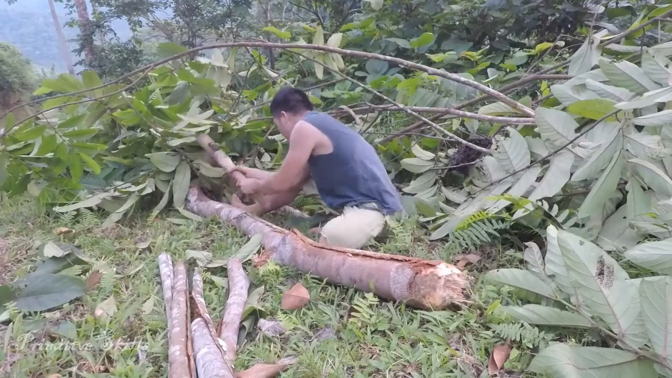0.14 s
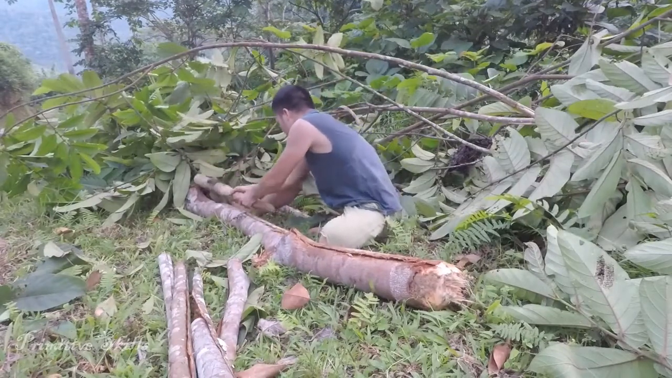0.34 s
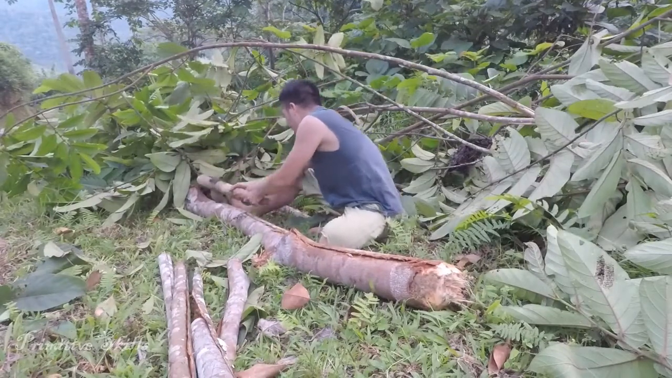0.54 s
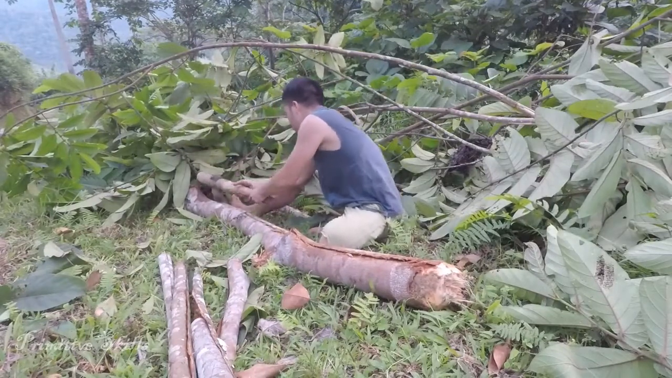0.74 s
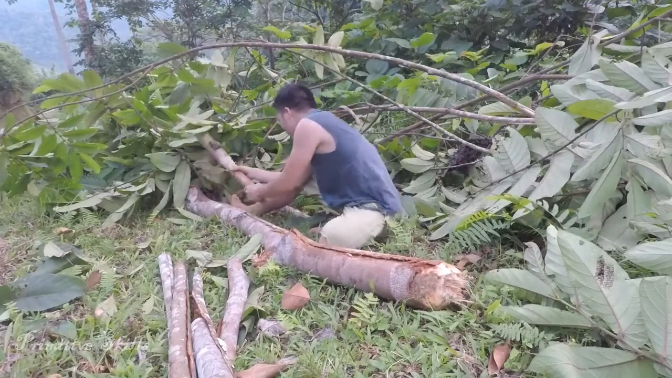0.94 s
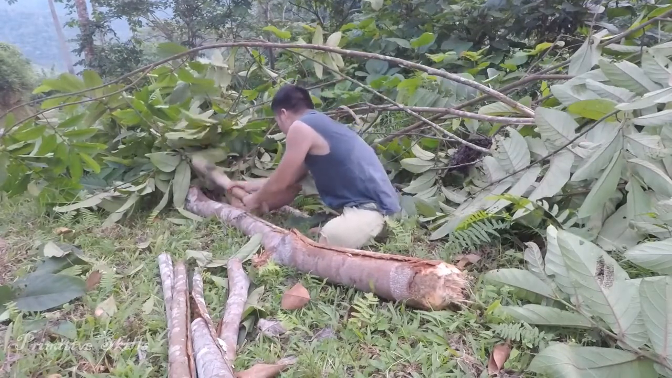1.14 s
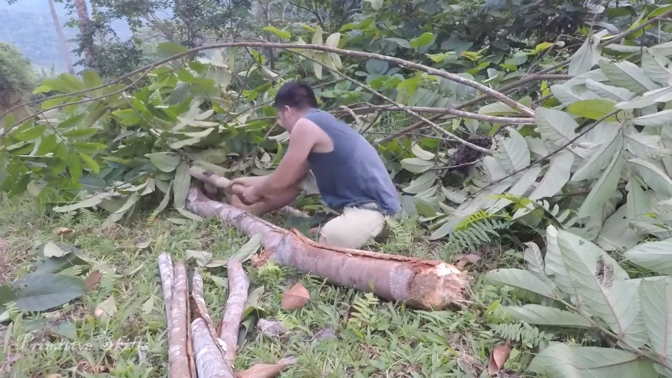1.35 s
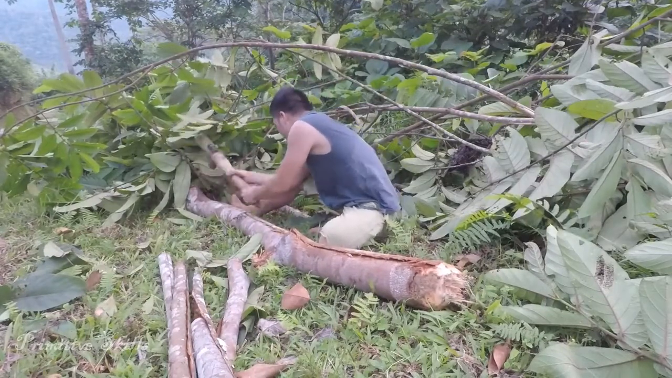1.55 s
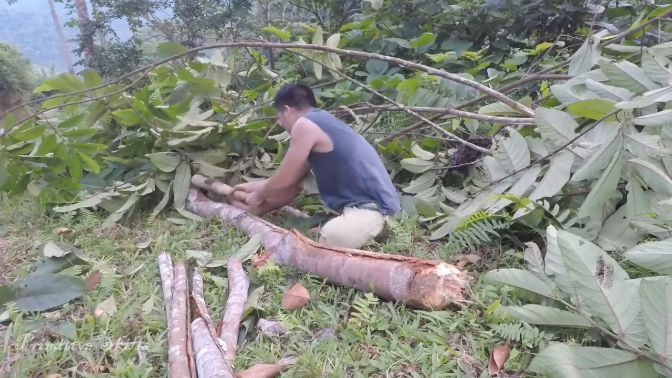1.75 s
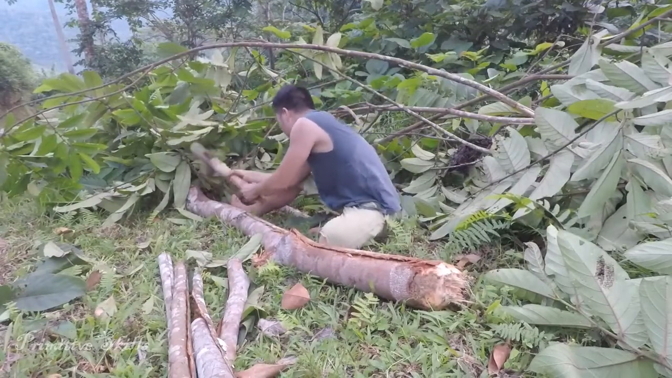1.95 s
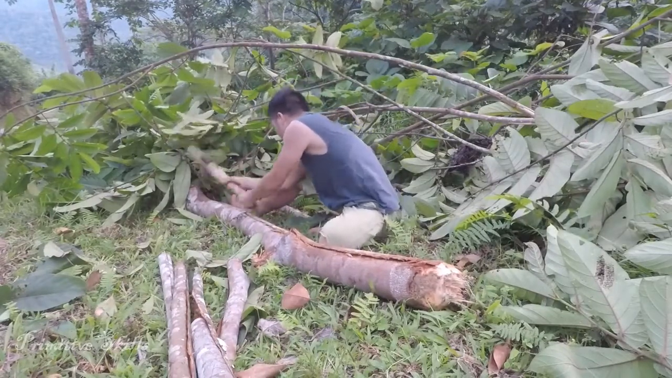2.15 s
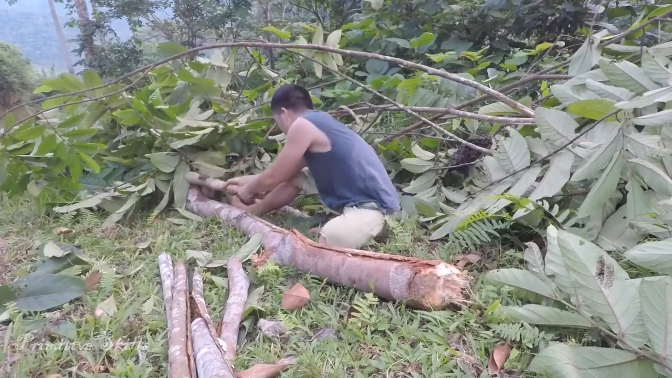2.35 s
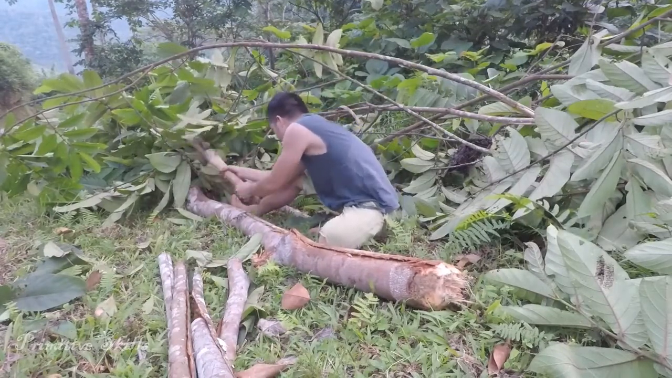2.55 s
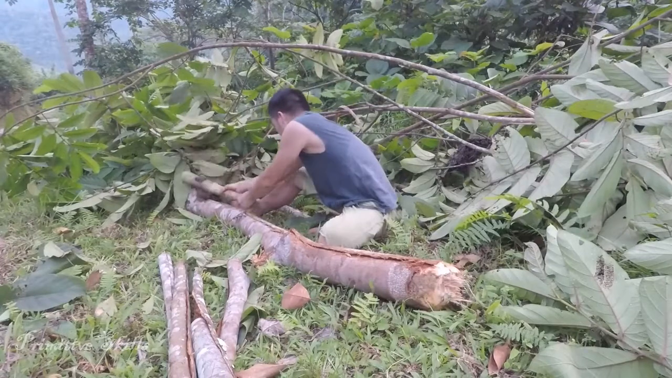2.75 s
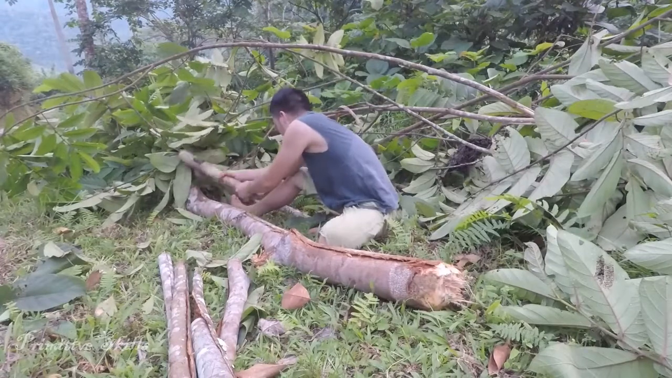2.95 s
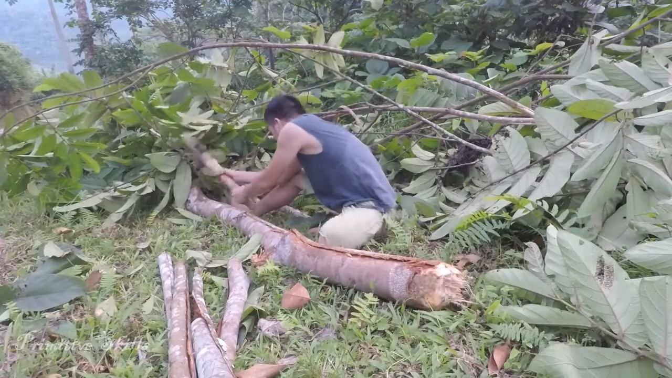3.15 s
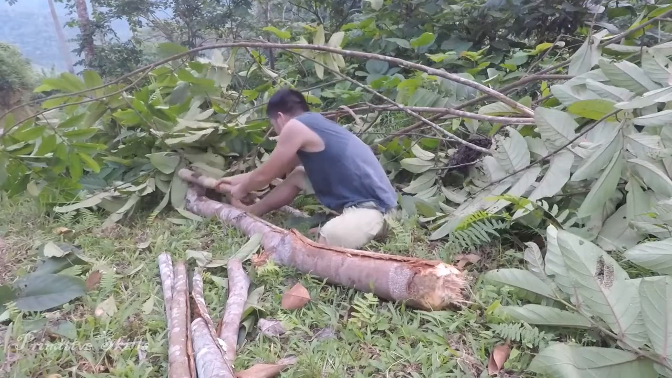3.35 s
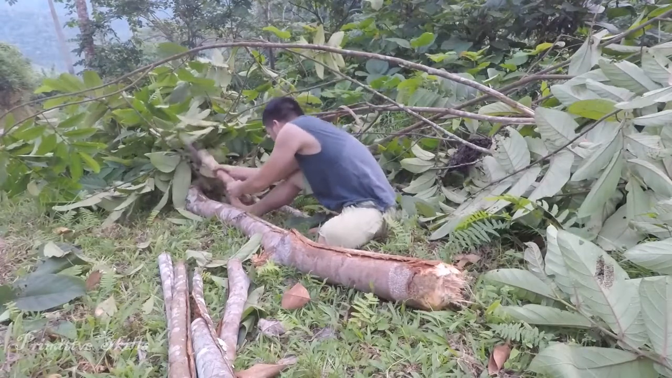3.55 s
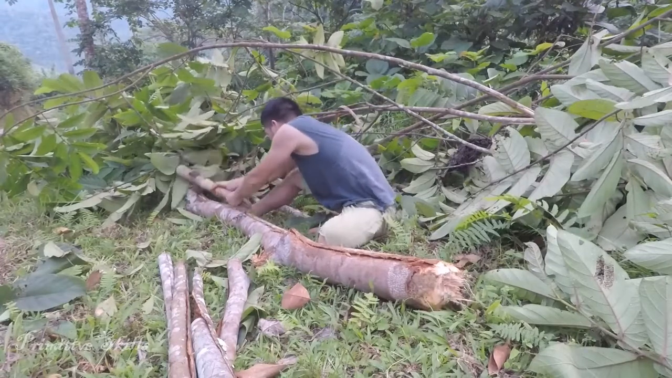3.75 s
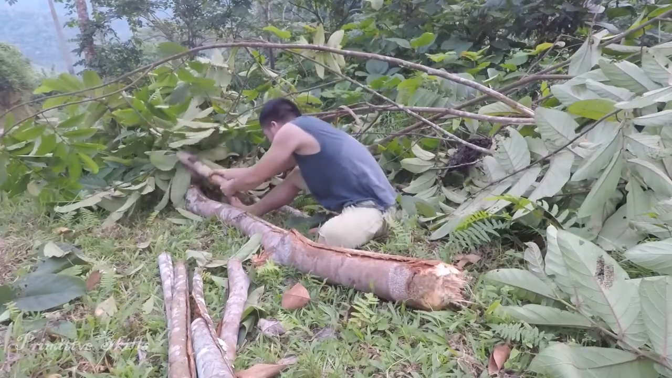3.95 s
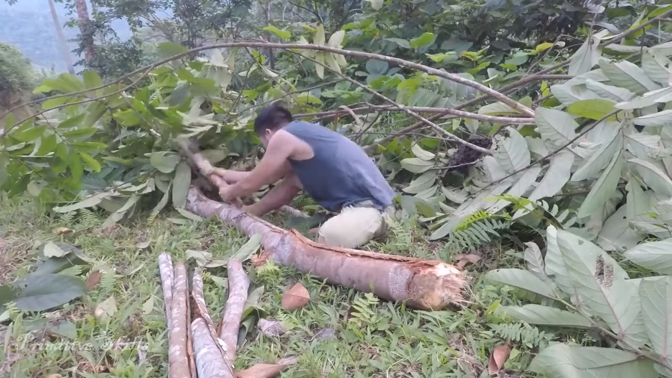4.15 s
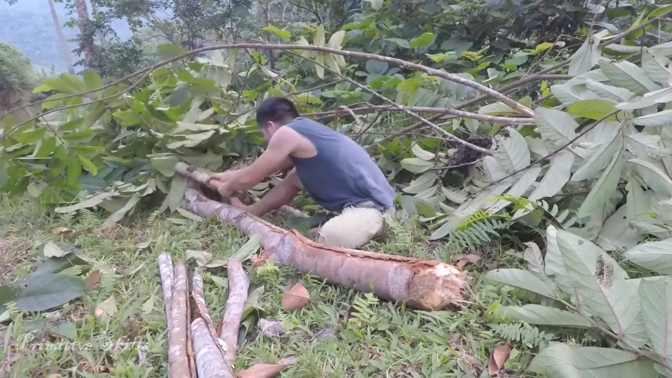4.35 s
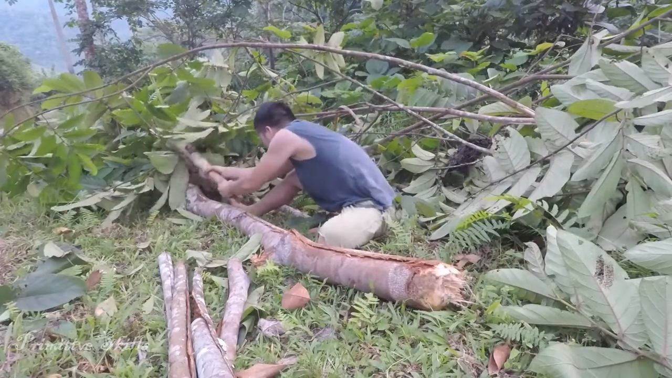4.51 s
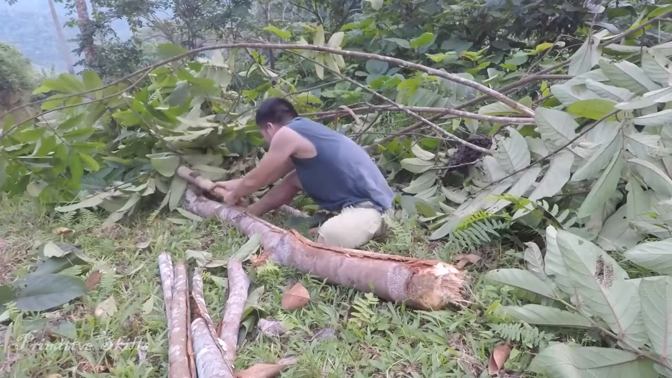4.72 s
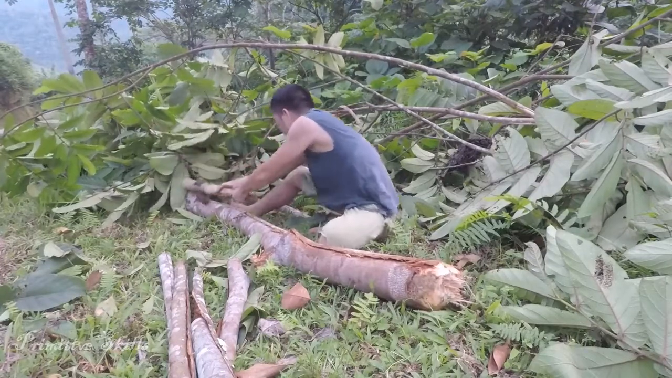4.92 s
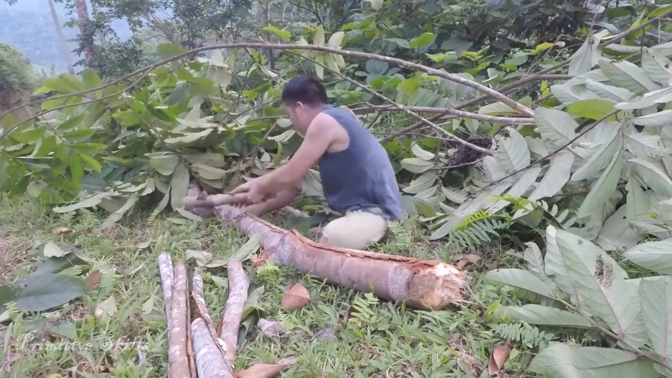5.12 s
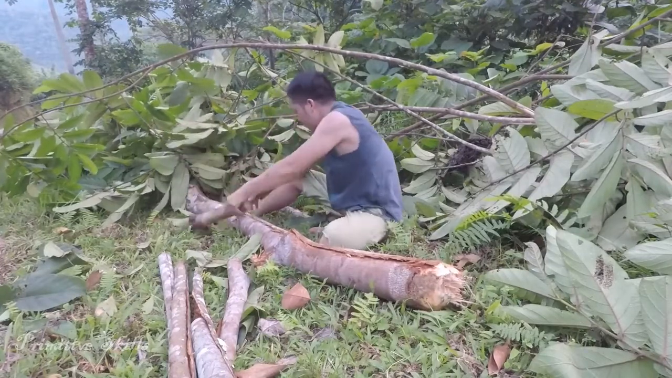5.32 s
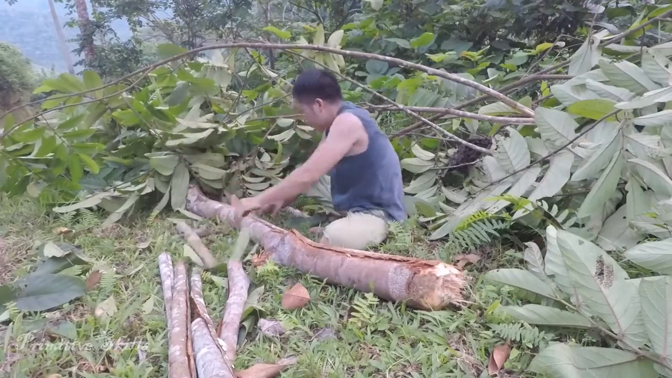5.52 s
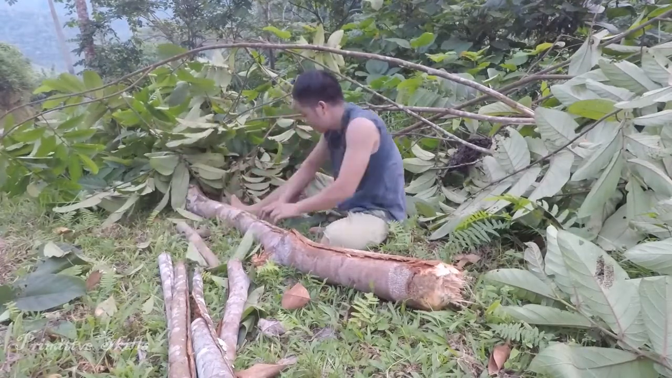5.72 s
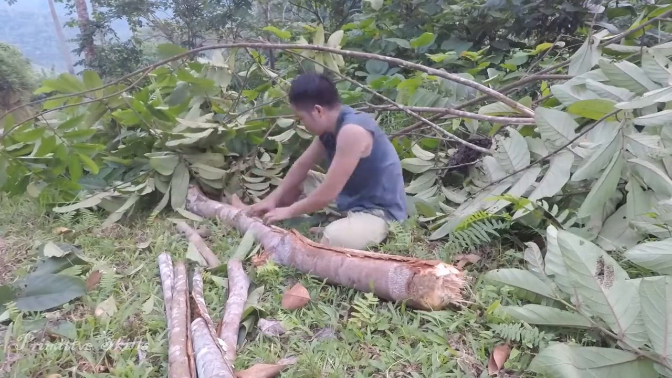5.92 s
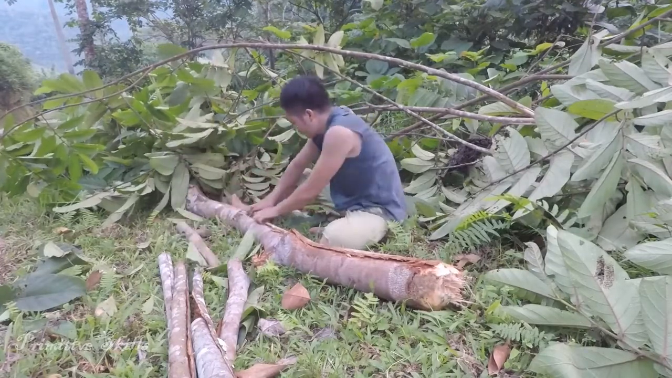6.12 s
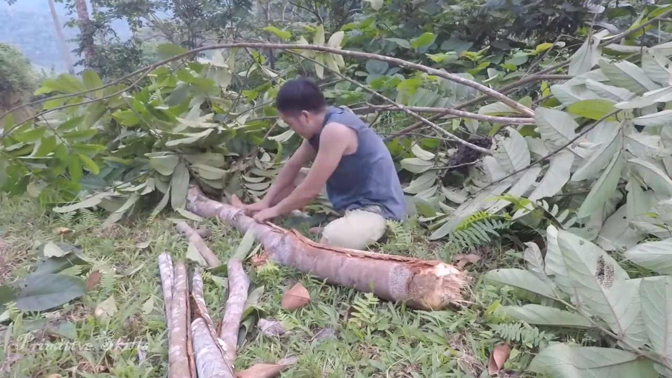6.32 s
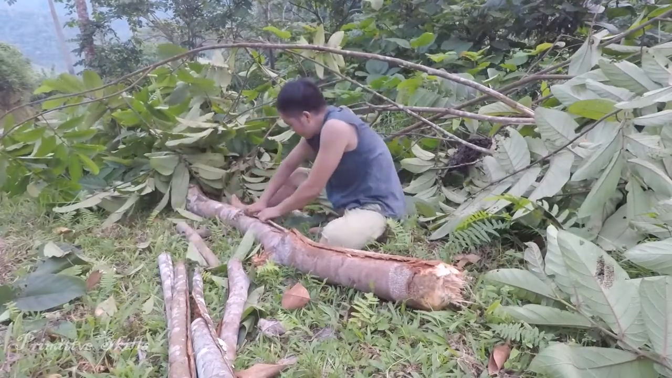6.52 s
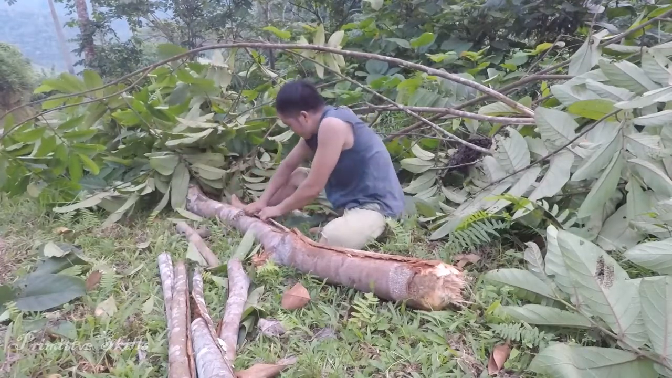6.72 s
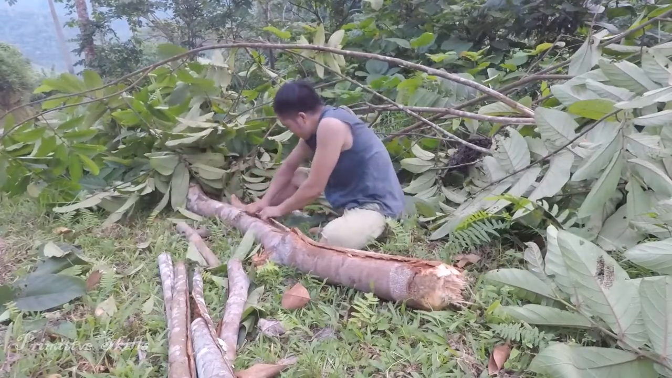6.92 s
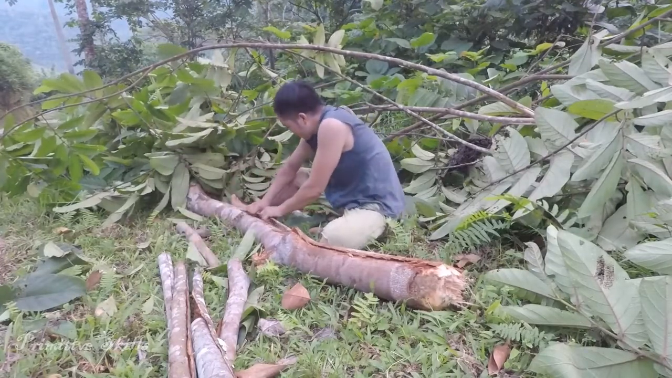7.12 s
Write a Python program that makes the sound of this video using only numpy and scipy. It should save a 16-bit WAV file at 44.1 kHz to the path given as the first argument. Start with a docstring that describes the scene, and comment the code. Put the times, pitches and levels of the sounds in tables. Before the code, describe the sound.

Hollow woody knocks with crackling bark repeat about twice a second, then stop for rustles and small fibre snaps, over a constant shrill insect chorus.

```python
"""At a forest edge, a wooden club pounds a green log lying on grass in front of a stereo microphone on a stand.
Each blow crushes loosened bark in dense fibre clicks, then knocks in short resonant noise; six modes ring out.
The jolt shakes turf and stand; leaves and bark rustle as resonant grains, and single fibres snap.
Behind: far cicadas as narrow noise bands, an insect buzzing by scratches that ring in its wing,
a cricket whistling in thin wavering tones, and the steady hush and rumble of the forest."""
import sys
import numpy as np
from scipy import signal
from scipy.fft import rfft, irfft
from scipy.io import wavfile

SR = 44100
rng = np.random.default_rng(int(sys.argv[2]) if len(sys.argv) > 2 else 0)


def materialize(psi):
    """Save the field psi as 16-bit PCM at rate SR to the path in sys.argv[1].

    A 1-D psi becomes a single channel; in a 2-D psi each row is a channel.
    """
    bounded = np.clip(np.atleast_2d(psi).T, -1, 1)
    quanta = np.round(bounded * 32767).astype(np.int16)
    wavfile.write(sys.argv[1], SR, quanta)


N = 320607


def from_db(db):
    """Decibels to gain."""
    return 10 ** (np.asarray(db) / 20)


def rms_one(x):
    """Scale to unit rms."""
    return x / np.sqrt(np.mean(x ** 2) + 1e-20)


def at_hz(points, hz):
    """Read a table on a log-frequency axis."""
    points = np.array(points)
    return np.interp(np.log(hz + 1), np.log(points[:, 0]), points[:, 1])


def drift(rate_hz):
    """Slow random curve through normal knots of spread 1, rate_hz knots a second."""
    knots = rng.standard_normal(int(N / SR * 100) + 2)
    return np.interp(np.arange(N) / SR * rate_hz, np.arange(len(knots)), knots)


def resonate(x, hz, width_hz):
    """Two-pole resonance with a gain of about 1 on top."""
    r = np.exp(-np.pi * width_hz / SR)
    zeros = [(1 - r * r) / 2, 0, (r * r - 1) / 2]
    poles = [1, -2 * r * np.cos(2 * np.pi * hz / SR), r * r]
    return signal.lfilter(zeros, poles, x)


def resonate_twice(x, hz, width_hz):
    """The same resonance twice in a row, for steeper sides."""
    return resonate(resonate(x, hz, width_hz), hz, width_hz)


def band(x, low_hz, high_hz):
    """Gentle band-pass."""
    return signal.sosfilt(signal.butter(2, [low_hz, high_hz], "band", fs=SR, output="sos"), x)


def pan(x, db):
    """Place by level difference, left minus right."""
    return x * from_db([[db / 2], [-db / 2]])


def pair(alike):
    """Two white noises of given likeness, as left and right."""
    mid, side = rng.standard_normal((2, N))
    return np.sqrt((1 + alike) / 2) * mid + np.sqrt((1 - alike) / 2) * side * [[1], [-1]]


def grains(per_s, spread_db):
    """Random clicks of uneven size, rms 1."""
    sizes = from_db(spread_db * np.minimum(rng.exponential(1, N), 4))
    signed = sizes * rng.choice([-1, 1], N)
    return rms_one(signed * (rng.random(N) < per_s / SR))


def add(out, s, piece):
    """Mix a short piece in at time s."""
    at = round(s * SR)
    out[..., at:at + piece.shape[-1]] += piece[..., :N - at]


def burst(hz, width_hz, t60, rise_s):
    """A short dying noise coloured by a steep resonance, peak 1."""
    t = np.arange(8192) / SR
    noise = rng.standard_normal(8192) * (1 - np.exp(-t / rise_s)) * from_db(-60 * t / t60)
    coloured = resonate_twice(noise, hz, width_hz)
    return coloured / np.abs(coloured).max()


# Colour of the forest air, only its shape counts: (frequency [Hz], relative level [dB per Hz])
FOREST_COLOUR = [(25, -21), (60, -25), (112, -35), (134, -5.5), (180, -0.5), (300, -5.5), (550, -7.5),
                 (1000, -10.5), (1700, -15.5), (2600, -16), (4000, -15.5), (6300, -13.5), (8100, -16),
                 (8900, -56), (13000, -69), (14500, -68)]
# Left-right likeness of the forest air: (frequency [Hz], likeness [-1 to 1])
FOREST_ALIKE = [(100, 0.14), (300, -0.39), (800, -0.84), (1400, -0.56), (2000, -0.12), (4200, 1), (6500, 1),
                (9000, -0.63)]
FOREST_DB = -46


def forest():
    """Steady far hush and low rumble, its likeness between channels changing with pitch."""
    hz = np.arange(N // 2 + 1) * SR / N
    alike = np.clip(at_hz(FOREST_ALIKE, hz), -1, 1)
    mid, side = rfft(rng.standard_normal((2, N))) * from_db(at_hz(FOREST_COLOUR, hz))
    both = np.sqrt(1 + alike) * mid + np.sqrt(1 - alike) * side * [[1], [-1]]
    return from_db(FOREST_DB) * rms_one(irfft(both, N))


# Far insect chorus, one band a row: (centre [Hz], width of each of two resonances [Hz],
# level before panning and shimmer [dB], left minus right [dB], left-right likeness [0 to 1])
CICADA_BANDS = [(2463, 190, -64.5, -3, 0.88), (4777, 343, -46, 0, 0.71), (5090, 110, -49.5, 1, 0.91),
                (5430, 280, -48.5, 0.5, 0.4), (5730, 620, -49.5, 8, 0.19), (6870, 180, -53.5, 4.5, 0.27),
                (7385, 810, -52, 16.5, 0.33), (7370, 90, -64.5, 13, 0.13), (7790, 266, -59.5, -20, 0.066)]


def cicadas():
    """Many far tymbals merge into noise in narrow bands that shimmer, a little together and more on their own."""
    out, together = 0, drift(2.7)
    for hz, width_hz, level_db, pan_db, alike in CICADA_BANDS:
        voice = rms_one(resonate_twice(pair(np.clip(alike, 0, 1)), hz, width_hz))
        shimmer_db = 0.6 * together + 0.9 * drift(25)
        out = out + pan(voice, pan_db) * from_db(level_db + shimmer_db)
    return out


# Wing resonances of the buzzing insect: (centre [Hz], width [Hz], relative level [dB])
WING_MODES = [(7000, 500, -29), (7343, 41, 16.5), (7700, 220, 13)]
STROKE_HZ, TOOTH_HZ, TEETH = 50, 410.6, 6.7
BUZZ_DB = -50  # before panning


def buzz():
    """Each wing stroke drags over several teeth; each tooth gives a short scratch that rings in the wing."""
    t = np.arange(N) / SR
    tooth = (t * STROKE_HZ % 1) / STROKE_HZ * TOOTH_HZ
    gate = (tooth < TEETH) * np.exp(-(tooth % 1) / 0.083)
    scratch = gate * pair(0.42)
    wing = sum(from_db(db) * resonate(scratch, hz, width_hz) for hz, width_hz, db in WING_MODES)
    return from_db(BUZZ_DB) * pan(rms_one(band(wing, 6900, 7800)), 5.2)


# Loudest cricket chirps, over the steady whistle, before level drift: (time [s], length [s], level [dB])
CHIRPS = [(0, 0.11, -55), (0.32, 0.087, -56), (0.467, 0.053, -54), (0.546, 0.04, -56), (0.685, 0.17, -55.5),
          (1.087, 0.042, -50), (1.175, .07, -55), (2.056, 0.21, -63), (2.397, 0.18, -61),
          (2.884, 0.069, -57), (3.586, 0.075, -54), (4.58, 0.064, -52), (5.773, 0.066, -60),
          (5.954, 0.063, -55), (7.185, 0.1, -56)]
# Cricket pitch before its wavering: (time [s], frequency [Hz])
WHISTLE_PITCH = [(0, 3555), (4.0, 3540), (5.5, 3490), (7.27, 3470)]
PULSE_HZ, LINES_DB = 294, [0, -8, -32]  # spacing and levels of the whistle and the lines above it
FAINT_CHIRP_DB, STEADY_WHISTLE_DB = -62, -61


def cricket():
    """A thin wavering whistle, louder in chirps, faint ones at random; its fast pulsing adds weaker lines above."""
    t = np.arange(N) / SR
    chirps = 0
    for s, length_s, db in CHIRPS:
        edges = np.minimum(t - s, s + length_s - t) / 0.022
        chirps = chirps + from_db(db) * np.clip(edges, 0, 1)
    faint = np.clip(4 * (drift(14) - 0.4), 0, 1)
    chirps = np.maximum(chirps, from_db(FAINT_CHIRP_DB) * faint)

    pitch_s, pitch_hz = np.transpose(WHISTLE_PITCH)
    hz = np.interp(t, pitch_s, pitch_hz) + 18 * drift(30)
    tone = 0
    for k, db in enumerate(LINES_DB):
        tone = tone + from_db(db) * np.sin(2 * np.pi * np.cumsum(hz + k * PULSE_HZ) / SR)
    loudness = (chirps + from_db(STEADY_WHISTLE_DB)) * from_db(3.2 * drift(45))
    return pan(loudness * tone, 0.41)


def near_log(x):
    """Sound from the log reaches the left port with a dip where the two paths round the housing cancel."""
    left = from_db(3.5) * (x - 0.92 * resonate(x, 1300, 1100))
    right = from_db(0.5) * x
    return np.array([left, right])


# Leaves and bark stirred by club and hands:
# (start of hold [s], hold [s], body level [dB], crisp level [dB])
STIRRINGS = [(0.917, 0.14, -51.5, -70), (2.064, .02, -51, -86.5), (2.485, 0.013, -43.5, -74),
             (2.89, 0.018, -50.5, -76), (3.133, .02, -51, -76), (3.488, 0.054, -44, -74),
             (4.005, 0.023, -39, -74), (4.373, 0.17, -46.5, -77), (4.83, .02, -45, -74),
             (5.014, 0.018, -52, -78), (5.317, 0.022, -51, -57), (5.572, 0.017, -45.5, -62),
             (7.06, 0.2, -51, -59.5)]
STIR_RISE_DB_PER_S, STIR_FALL_DB_PER_S = 141, 96
REST_BODY_DB, REST_CRISP_DB = -72.5, -73  # never quieter than this


def rustle():
    """Small grains dealt to leaves of many sizes, each stirring on its own; part is unrelated in each channel."""
    t = np.arange(N) / SR
    body_gain, crisp_gain = from_db(REST_BODY_DB), from_db(REST_CRISP_DB)
    for s, hold_s, body_db, crisp_db in STIRRINGS:
        rise_db = -STIR_RISE_DB_PER_S * np.maximum(s - t, 0)
        fall_db = -STIR_FALL_DB_PER_S * np.maximum(t - s - hold_s, 0)
        shape = from_db(rise_db + fall_db)
        body_gain = np.maximum(body_gain, from_db(body_db) * shape)
        crisp_gain = np.maximum(crisp_gain, from_db(crisp_db) * shape)

    leaves = 0
    for hz in np.geomspace(1350, 4300, num=9):
        stirred = (near_log(grains(300, 2.7)) + 1.2 * pair(0)) * from_db(5.3 * drift(30))
        leaves = leaves + resonate(stirred, hz, 0.25 * hz)
    crisp = rms_one(band(pair(0.3) * from_db(2.5 * drift(30)), 8800, 13600))
    return body_gain * rms_one(leaves) + crisp_gain * crisp


# Blows of the club, played by the next three sources; levels are those of each part before placing and filtering:
# (time [s], loose bark crushed before it [s], crush [dB], weight lands after [s], weight [dB],
#  dull knock [dB], crack [dB], crack centre [Hz], bright snap [dB], then the ring: deep mode [dB],
#  low pair [dB], middle pair [dB], lean of the middle pair to its lower mode [dB], top mode [dB])
CLUB_BLOWS = [(0.418, 0.007, -50, 0.003, -25, -22, -6, 1350, -27.5, -26, -11, -15.5, -6, -19.5),
              (1.277, 0.01, -38.5, .0052, -7.5, -21.5, -12, 1560, -25, -25, -15, -15, -0.5, -12.5),
              (1.777, 0.0076, -47, 0.0054, -14, -23, -11, 1490, -15.5, -28.5, -15.5, -17, 4.5, -19),
              (2.298, 0.0098, -38, 0.0056, -4, -20, -12, 1760, -22, -25, -18, -20, 8, -16),
              (2.813, 0.012, -36.5, 0.0036, -10, -19, -17, 1520, -20, -25.5, -25.5, -20, 8, -16),
              (3.326, .018, -36, 0.0045, -6, -29, -11.5, 1460, -20, -22.5, -28.5, -25, 2, -14.5),
              (3.831, .022, -39, 0.00436, -5.5, -28, -10.5, 1490, -21, -20.5, -21, -27, 7, -20),
              (4.3097, .0248, -36.5, 0.0033, -6.5, -26, -12, 1800, -21, -18.5, -13.5, -27.5, 23, -28),
              (4.7663, .0228, -37, 0.00398, -8, -33, -12.5, 1700, -20, -22, -17, -21, 6.5, -24.5)]
TURF_BELOW_DEEP_DB = -1.5  # turf thud against the deep mode


def ground_shake():
    """The log is pressed into the turf; the jolt travels through the soil and rocks the stand a moment later."""
    turf, stand = np.zeros((2, 2, N))
    for s, *_, deep_db, _, _, _, _ in CLUB_BLOWS:
        left = burst(156.7, 49, t60=0.3, rise_s=0.006)
        right = burst(170, 74, t60=0.2, rise_s=0.015)
        thud = np.array([left, 0.08 * left + 0.48 * right])
        add(turf, s, from_db(deep_db + TURF_BELOW_DEEP_DB) * thud)
        rocking = burst(65, 51, t60=0.18, rise_s=0.018)
        add(stand, s + 0.0364, from_db(-55.5) * pan(rocking, 6.0))
    return turf, stand


# Modes of the log: (frequency [Hz], t60 [s], left minus right [dB], left lag [s], late start [s])
LOG_MODES = [(172, .13, 8, 0, 0), (299, .2, 4, 0, .0007), (334, .18, 6, 0, 0),
             (460, .135, 7, .00014, .0004), (495, .12, 8.5, .0001, 0), (641, .093, 9.5, .00027, 0)]
# What each mode still rings with at the start, from an earlier blow: level [dB]
EARLIER_RING = [-31, -34, -35, -43, -48, -55]
LOWER_OF_LOW_PAIR_DB = -10.5  # against the upper of that pair
LANDING_LEAD_S = 0.0011  # pulse and ring begin this much before the landing time


def log_ring():
    """The weight lands as one dull pulse; the modes swell fast and ring out, wavering in level."""
    out, t = np.zeros((2, N)), np.arange(SR // 2) / SR
    rings = []
    for hz, t60, pan_db, lag_s, _ in LOG_MODES:
        wave = np.sin(2 * np.pi * hz * (t - np.array([[lag_s], [0]])))
        rings.append(pan(wave * from_db(-60 * t / t60), pan_db))
    pulse = np.sin(2 * np.pi * 520 * t) * np.minimum(t / 0.0012, 1) * from_db(-60 * t / 0.013)
    swell = np.minimum(t / 0.003, 1)

    for ring, db in zip(rings, EARLIER_RING):
        add(out, 0, from_db(db) * ring)
    for s, _, _, delay_s, weight_db, *_, deep_db, low_db, middle_db, lean_db, top_db in CLUB_BLOWS:
        landing_s = s + delay_s - LANDING_LEAD_S
        strengths = [deep_db, low_db + LOWER_OF_LOW_PAIR_DB, low_db,
                     middle_db + lean_db / 2, middle_db - lean_db / 2, top_db]
        for ring, db, mode in zip(rings, strengths, LOG_MODES):
            late_s = mode[-1]
            add(out, landing_s + late_s, from_db(db) * ring * swell)
        add(out, landing_s, from_db(weight_db) * pan(pulse, 7.8))
    return out * from_db(1.3 * drift(80))


def contact(hz, width_hz, length_s, peak_at):
    """Noise that lasts only while club and wood touch, ringing on briefly in one resonance; peak 1."""
    u = np.arange(2048) / SR / length_s  # 0 to 1 over the touch
    force = np.interp(u, [0, np.clip(peak_at, 0.05, 0.9), 1], [0.3, 1, 0])
    x = resonate_twice(rng.standard_normal(2048) * force, hz, width_hz)
    return x / np.abs(x).max()


# First touch over the crush: the deeper the loose bark, the clearer
FIRST_TOUCH_DB, FIRST_TOUCH_DB_PER_S = 2.5, 494


def crush(fibres, level_db, hz):
    """A first touch, then dense fibre clicks for as long as the bark gives way; the dull part fades first."""
    t = np.arange(len(fibres)) / SR
    edge = np.minimum(1, t[::-1] / 0.0012)  # soft end
    dull = 4.1 * band(fibres, 165, 650) * from_db(-200 * t)
    body = resonate_twice(fibres, hz, 2.8 * hz) + dull
    touch_db = level_db + FIRST_TOUCH_DB + FIRST_TOUCH_DB_PER_S * min(t[-1], 0.026)
    out = from_db(touch_db) * burst(1400, 1500, t60=0.07, rise_s=0.0002)
    add(out, 0, from_db(level_db) * edge * rms_one(body))
    return out


# Single fibres snapping: (time [s], peak level [dB], centre [Hz])
FIBRE_SNAPS = [(1.013, -38, 3200), (1.553, -37.5, 3200), (2.053, -47, 2430), (5.266, -41, 3220),
               (5.365, -44, 10300), (5.559, -51, 1320), (5.580, -26, 3900), (5.589, -30.5, 5240),
               (6.295, -31.5, 1590), (6.402, -41, 1500), (6.487, -43, 1780), (6.567, -39.5, 2640),
               (7.212, -35.5, 3060)]
# The club drops on loose bark and grass: (time [s], level [dB], length [s], centre [Hz])
CLUB_LAID_DOWN = (5.555, -43.5, .045, 2500)
CONTACT_S = 0.014  # the dull knock; brighter parts last a fraction of it
CRUSH_HZ, CRUSH_OUTLASTS_S = 1900, 0.001
# Loose bark throws more debris: level on bare wood, and its change per second of crushing
DEBRIS_DB, DEBRIS_DB_PER_S = -36, 415


def cracks():
    """Surface sounds of each blow, crushed bark, the club laid down and single snaps."""
    out, fibres = np.zeros(N), grains(4000, 6.0)
    for s, loose_s, crush_db, _, _, knock_db, crack_db, crack_hz, snap_db, *_ in CLUB_BLOWS:
        add(out, s, from_db(knock_db) * contact(700, 750, CONTACT_S, peak_at=0.9))
        add(out, s, from_db(crack_db) * contact(crack_hz, 580, 0.75 * CONTACT_S, peak_at=0.2))
        add(out, s, from_db(snap_db) * contact(3900, 2200, 0.48 * CONTACT_S, peak_at=0.47))
        add(out, s, from_db(-39) * contact(7700, 5900, 0.55 * CONTACT_S, peak_at=0.1))
        debris_db = DEBRIS_DB + DEBRIS_DB_PER_S * loose_s
        add(out, s, from_db(debris_db) * burst(980, 3300, t60=0.23, rise_s=0.0018))
        crushed = fibres[round((s - loose_s) * SR):round((s + CRUSH_OUTLASTS_S) * SR)]
        add(out, s - loose_s, crush(crushed, crush_db, CRUSH_HZ))

    s, level_db, length_s, hz = CLUB_LAID_DOWN
    pressed = fibres[round(s * SR):round((s + length_s) * SR)]
    add(out, s, crush(pressed, level_db, hz))
    for s, peak_db, hz in FIBRE_SNAPS:
        add(out, s, from_db(peak_db) * burst(hz, 0.39 * hz, t60=0.038, rise_s=0.00027))
    return out


BASS_CUT_HZ = 166


def scene():
    """Work at the log in front, the deepest bass of the blows thinned by the microphone's high-pass; insects behind."""
    background = forest() + cicadas() + buzz() + cricket()
    turf, stand = ground_shake()
    blows = log_ring() + near_log(cracks()) + turf
    blows = signal.sosfilt(signal.butter(4, BASS_CUT_HZ, "high", fs=SR, output="sos"), blows)
    return background + rustle() + stand + blows


CUTOFF_HZ = 15700


def record(dry):
    """The top is cut by a steep low-pass."""
    return signal.sosfilt(signal.cheby2(12, 70, CUTOFF_HZ, fs=SR, output="sos"), dry)


dry = scene()
out = record(dry)
materialize(out)
```